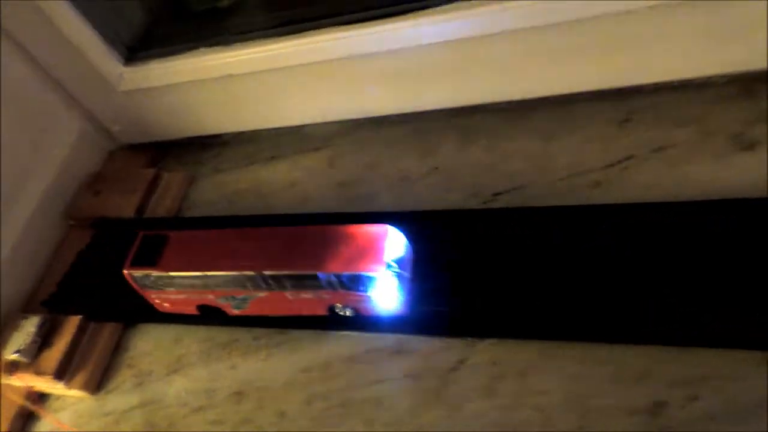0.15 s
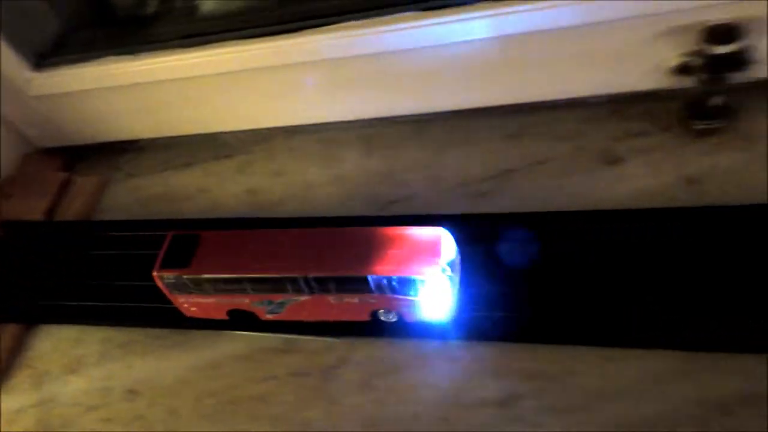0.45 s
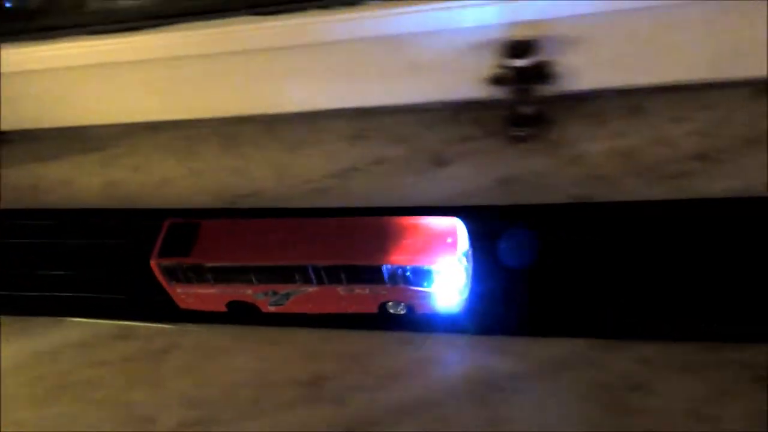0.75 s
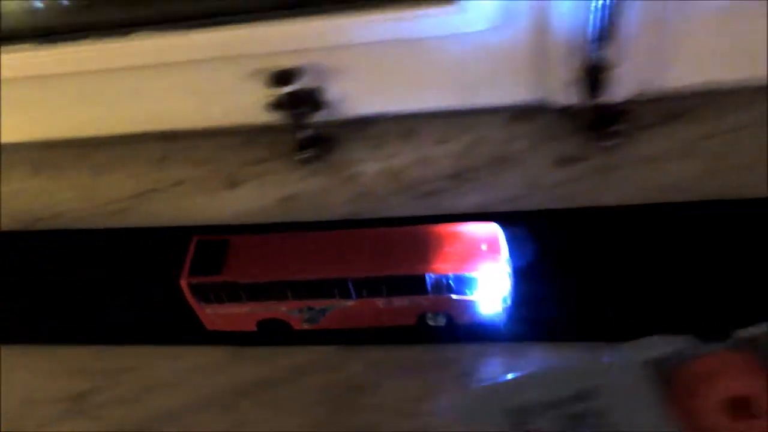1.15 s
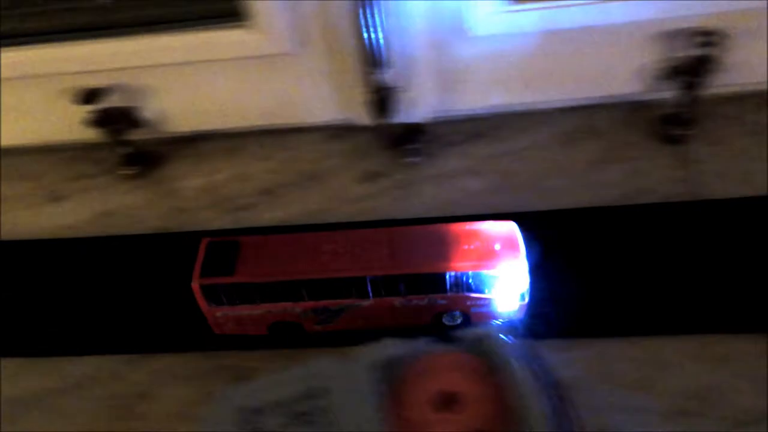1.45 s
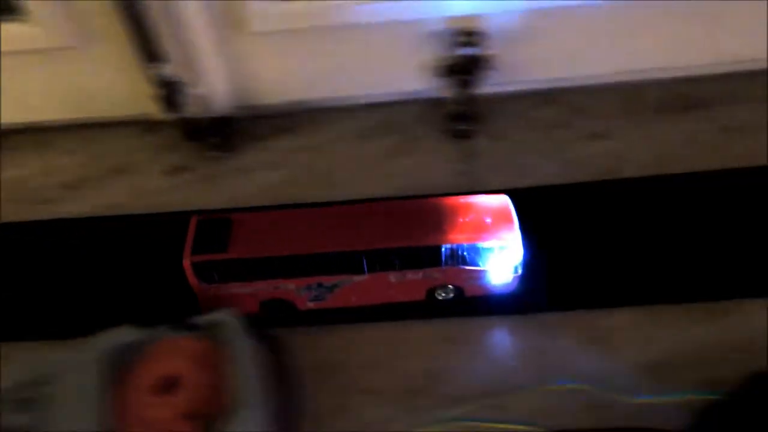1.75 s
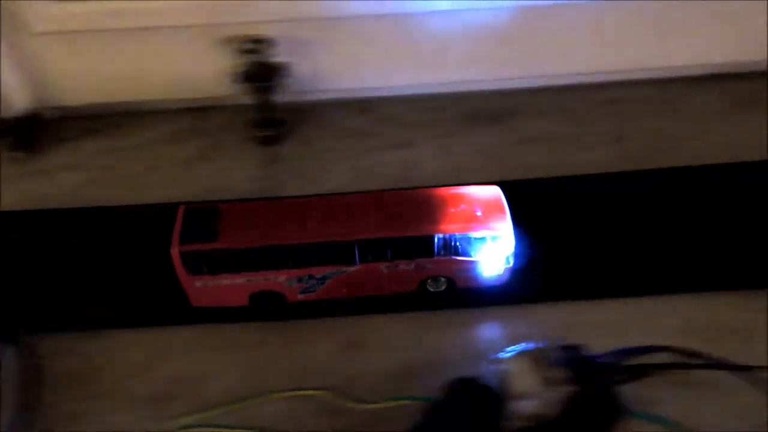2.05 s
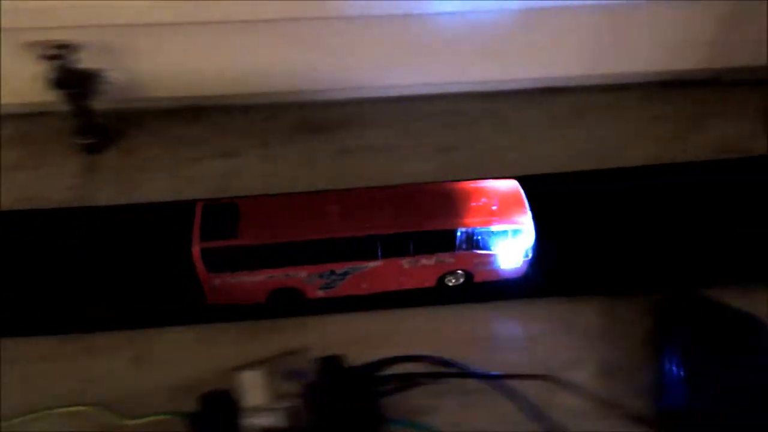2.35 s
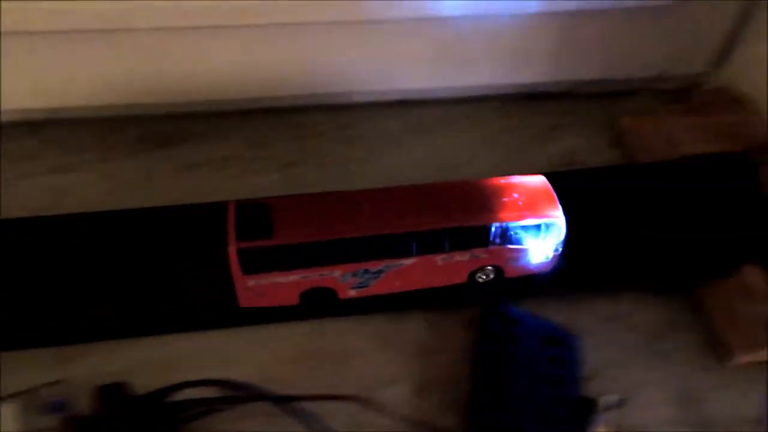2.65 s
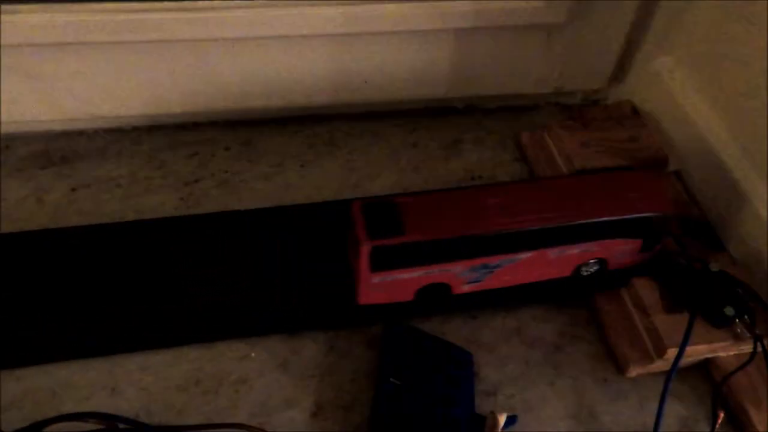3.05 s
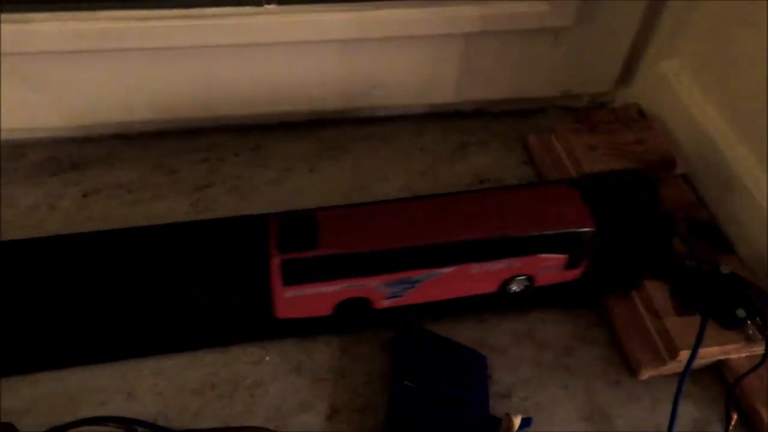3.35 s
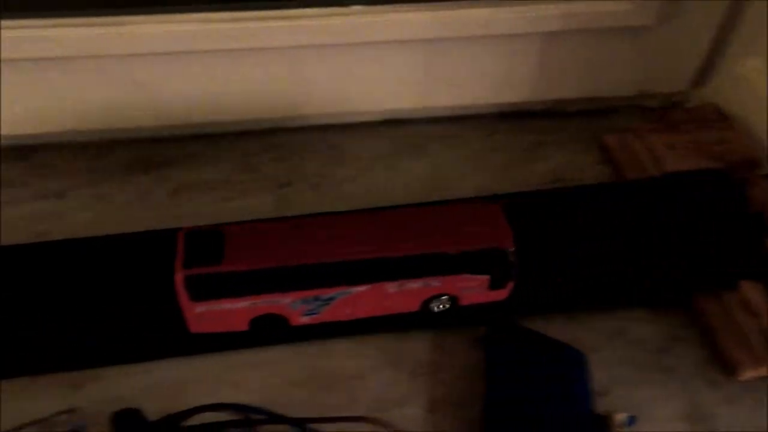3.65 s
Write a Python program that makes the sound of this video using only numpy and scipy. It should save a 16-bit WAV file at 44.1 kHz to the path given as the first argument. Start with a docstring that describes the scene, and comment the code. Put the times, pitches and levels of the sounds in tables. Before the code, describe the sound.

Close up in a quiet room, a toy bus's wheels grind and gears hiss while track joints knock and rattle irregularly; a hard plastic snap at the end, a short lull, then the whir resumes.

```python
"""A small electric toy bus gathers speed along a hollow plastic track on a floor indoors.
Wheels grind as noise roughened by impacts, gears hiss, loose parts ring, and the track hums in drifting modes.
Joints knock the body with short noise-driven rings, cracks and rattles; the rumble swells mid-track.
The bus snaps against the end stop in sharp bursts of noise, the grind dips, and it sets off back.
Faint coloured noise fills the room, and the walls echo the knocks."""
import sys
import numpy as np
from scipy import signal
from scipy.fft import rfft, irfft
from scipy.io import wavfile
from scipy.ndimage import uniform_filter1d

SR = 44100
rng = np.random.default_rng(int(sys.argv[2]) if len(sys.argv) > 2 else 0)


def digitize_waveform(pressure):
    """Quantize a signal to 16-bit integers and store it at the path in sys.argv[1].

    Rows of a 2-D input are taken as channels; values are limited to [-1, 1].
    """
    field = np.atleast_2d(pressure).T
    bounded = np.clip(field, -1, 1)
    quanta = np.round(bounded * 32767).astype(np.int16)
    wavfile.write(sys.argv[1], SR, quanta)


N = 167139

# resonances of the toy's body (f/Hz, width/Hz, level/dB)
BODY = [(1310, 530, 1.5), (1770, 150, 1.5), (2227, 93, 8.5), (2735, 254, 3.5), (3227, 256, 4.5),
        (4710, 520, -4.5)]


def rolling():
    """The bus on the track: hum and rumble, grinding wheels, hissing gears and a shrill chatter."""
    # loudness of the run (t/s, grind level/dB, gear level/dB, shrill chatter level/dB)
    run = [(0, -39, -40, -51), (.28, -38, -38, -45), (.42, -31, -35, -48), (.56, -31.5, -32.5, -38),
           (.93, -30.5, -31.5, -40), (1.26, -26.5, -30, -41), (1.66, -29, -31.5, -42),
           (1.96, -27, -32.5, -37.5), (2.29, -29.5, -30, -35), (2.56, -28.5, -31, -35),
           (2.8, -30, -30, -37), (3.14, -32, -33.5, -37), (3.25, -34, -40, -43), (3.33, -46.5, -41, -45),
           (3.41, -37.5, -36, -46), (3.52, -34.5, -31.5, -50), (3.65, -33, -30.5, -41),
           (3.79, -32, -29, -33)]
    # drift of the stereo image (t/s, left over right/dB)
    left_over_right = [(0, 1.3), (1.2, 0.5), (3.79, -0.5)]
    grind_db, gear_db, chatter_db = curves(run)
    shake_db = 0.7 * walk(24.91)  # flutter shared by wheels and gears
    track = track_hum() + track_rumble()
    grind = level(wheel_grind(shake_db)) * undb(grind_db)
    gears = level(gear_hiss(shake_db)) * undb(gear_db)
    chatter = shrill_chatter() * undb(chatter_db)
    mid, side = track + grind + gears + chatter
    pan_db, = curves(left_over_right)
    return stereo(mid, side) * undb(np.array([pan_db, -pan_db]) / 2)


def wheel_grind(shake_db):
    """Wheels rub grittily on plastic while loose parts tick in the body's resonances."""
    # spectrum of the rubbing (f/Hz, level/dB)
    rub_tone = [(300, -20.5), (750, -4), (1300, 1.5), (2250, 1.5), (3450, -3), (3800, -3), (6000, -3.5),
                (8000, -3), (9000, -3.5), (14000, -20)]
    ticks_db, cluster_db = -10, 1.8  # ticks against the rubbing; how far they bunch in time
    rub = level(colour(grit(shake_db + 0.5 * walk(60)), rub_tone))
    tick_level_db = ticks_db + shake_db + cluster_db * walk(39.97)
    body_ticks = ticks(BODY, 250)  # taps per second in each mode
    return rub + undb(tick_level_db) * body_ticks


def gear_hiss(shake_db):
    """Meshing gears as gritty noise in the high treble, sharing the wheels' flutter."""
    # spectrum of the hiss (f/Hz, level/dB)
    hiss_tone = [(8500, -21), (10500, -3), (12000, 4.5), (12800, 1), (13400, 3), (14200, -2)]
    return colour(grit(0.8 * shake_db + 0.86 * walk(90)), hiss_tone)


def shrill_chatter():
    """Small hard parts tapped so densely that their high resonances merge into a fluttering band."""
    # resonances of the small parts (f/Hz, width/Hz, level/dB)
    small_parts = [(7150, 730, 0.5), (9940, 420, 2), (12640, 340, 5.5)]
    return ticks(small_parts, 1200) * undb(2.0 * walk(29.96))


def track_hum():
    """Three modes of the hollow track, whose pitch and strength change along its length."""
    # hum along the run (t/s, low f/Hz, low level/dB, middle level/dB, upper f/Hz, upper level/dB)
    track_modes = [(.18, 700, -61, -52, 980, -49.5), (.4, 700, -49.5, -38.5, 972, -40.5),
                   (.72, 680, -45, -44, 997, -39.5), (1.0, 665, -46, -51.5, 997, -50),
                   (1.3, 647.5, -45, -37, 990, -45), (1.6, 639.7, -48.5, -44.5, 1000, -40),
                   (1.95, 630, -38.5, -39, 1015, -40), (2.17, 635, -42.5, -47, 1040, -37.5),
                   (2.5, 654.2, -51.5, -41.5, 1070, -50), (3.17, 676, -52.5, -52.5, 1075, -41.5),
                   (3.28, 660, -60, -58, 1075, -54.5), (3.45, 640, -52, -53, 1083, -45.5),
                   (3.79, 635, -51, -42, 1070, -40.5)]
    low_hz, low_db, middle_db, upper_hz, upper_db = curves(track_modes)
    low = hum(low_hz, 65, low_db)
    middle = hum(840, 48, middle_db)
    upper = hum(upper_hz, 70, upper_db)
    return low + middle + upper


def hum(hz, width_hz, db):
    """A noisy resonance: slow noise turns around a drifting centre while its level wavers."""
    drift, waver_db = 0.01, 2.5  # drift as a fraction of the pitch
    slow = signal.lfilter(*signal.butter(2, width_hz / 2, fs=SR), rng.standard_normal((2, 2, N)))
    phase = 2 * np.pi * np.cumsum(hz * (1 + drift * walk(6))) / SR
    tone = slow[0] * np.cos(phase) + slow[1] * np.sin(phase)
    return level(tone) * undb(db + waver_db * walk(16))


def track_rumble():
    """Noise in the track's low resonances, louder over the middle of the track."""
    # low resonances (f/Hz, width/Hz, level/dB)
    low_modes = [(189, 22, 1), (347, 106, -1.5), (570, 33, -0.5)]
    base_db, swell_db, peak_s, span_s = -59, 10.5, 1.77, 0.58
    swell = np.exp(-((np.arange(N) / SR - peak_s) / span_s) ** 2)
    rumble = level(resonate(rng.standard_normal((2, N)), low_modes))
    return rumble * undb(base_db + swell_db * swell)


def grit(flutter_db):
    """Dense tiny impacts of uneven size over smooth rubbing; a pair that flutters together."""
    rate, mean_db, top_db = 600, 3, 10  # impacts per second; their size before and at the cap
    sizes_db = np.minimum(mean_db * rng.exponential(size=N), top_db)
    hits = (rng.random(N) < rate / SR) * undb(sizes_db)
    hit_power = uniform_filter1d(hits ** 2, size=60) * SR / rate / 4
    roughness = np.sqrt(1 + hit_power)
    return rng.standard_normal((2, N)) * roughness * undb(flutter_db)


def ticks(modes, rate):
    """Loose parts chatter: many tiny taps, each ringing one mode briefly."""
    mean_db, top_db = 4, 4.5  # tap size before and at the cap
    out = 0
    for hz, width, db in modes:
        sizes_db = np.minimum(mean_db * rng.exponential(size=N), top_db)
        taps = (rng.random(N) < rate / SR) * undb(sizes_db)
        ring = resonate(taps * rng.standard_normal((2, N)), [(hz, width, db)])
        out = out + resonate(ring, [(hz, 2 * width, 0)])  # second pass rounds the attack
    return level(out)


def knocks():
    """Each joint: a short ring at its own pitch, a bright crack, a rattle through the body."""
    # wheels over joints (t/s, ring level/dB, ring f/Hz, crack over ring/dB, rattle over ring/dB)
    joints = [(0.399, -29, 3770, 9, -12), (0.471, -19.5, 3380, 4, -15), (0.5466, -19, 2230, 4, -19),
              (0.608, -17, 2293, 2, -10), (0.7346, -16.5, 3200, 1, -3), (0.8561, -20, 3070, 2, 0),
              (0.9817, -12, 2340, -2, -3.5), (1.0553, -20.5, 2440, 7, -0.5), (1.102, -14, 2970, -1.5, -7),
              (1.119, -19, 1710, 6, 1.5), (1.2119, -13.5, 3200, -3.5, -2), (1.3231, -17, 3100, -3, -3),
              (1.3592, -18, 2130, 3.5, 1), (1.4286, -19, 1947, 2, -1.5), (1.5377, -14.5, 1578, -1.5, -3.5),
              (1.5877, -22, 2886, 6.5, 2.5), (1.6396, -12.5, 1750, -2.5, -9), (1.734, -17, 2020, 4.5, -1.5),
              (1.7894, -19.5, 2480, -12, -17), (1.8477, -11.5, 2800, -5.5, -10.5),
              (1.955, -18.5, 2010, 2, 0), (2.1082, -19, 2270, -11, -11), (2.1762, -16, 2050, -8, -4.5),
              (2.2807, -18, 2000, 0, -15), (2.397, -14, 3280, 4, -8), (2.5125, -26, 2800, 9, 7),
              (2.5605, -19, 2344, 1, -16), (2.6284, -18.5, 2080, 2.5, -0.5), (2.6729, -19.5, 3260, 7, -2.5),
              (2.7466, -21, 2220, 5.5, 4), (2.8754, -16.5, 2230, -3, -23), (3.0002, -18.5, 2295, -16, -2.5),
              (3.142, -15, 2360, -1.5, -6), (3.1753, -13.5, 2760, -3, -2.5), (3.2945, -25, 2000, -9, -5.5),
              (3.6432, -18, 2720, -4, -5), (3.7705, -22.5, 2270, 2.5, -2.5)]
    ring_t60_s, crack_t60_s, rattle_t60_s = 0.033, 0.017, 0.19  # decay of the driving noise
    rise = rise_curve(0.0017)
    out = np.zeros((2, N))
    for s, db, hz, crack_db, rattle_db in joints:
        noise = rng.standard_normal((3, 2, len(rise))) * rise
        ring = resonate(noise[0] * fade(ring_t60_s), [(hz, 450, 0)])
        crack = resonate(noise[1] * fade(crack_t60_s), [(4370, 5600, 0), (7640, 7700, 0)])
        rattle = resonate(noise[2] * fade(rattle_t60_s), BODY)
        knock = peak(ring) + undb(crack_db) * peak(crack) + undb(rattle_db) * peak(rattle)
        add(out, s, undb(db) * knock)
    return stereo(*out)


def snaps():
    """Hard plastic snaps, most at the end stop: bright noise bursts with a short, weaker tail."""
    # snaps (t/s, level/dB, level of the part under 5 kHz/dB)
    strikes = [(.678, -14, -3), (3.127, -18, 0), (3.181, -17, -5), (3.1905, -16, -10), (3.198, -19, -8),
               (3.2074, -3, -7), (3.2135, -19, -3), (3.218, -21, -1), (3.3523, -16, -25)]
    # spectrum of a snap (f/Hz, level/dB)
    snap_tone = [(470, -54), (800, -9), (3870, -7), (5630, -7.5), (7010, 2), (7910, -2), (13200, -2),
                 (14500, 1)]
    snap_t60_s, tail_db, tail_t60_s = 0.009, -23, 0.06
    decay = fade(snap_t60_s) + undb(tail_db) * fade(tail_t60_s)
    shape = rise_curve(0.002) ** 2 * decay
    noise = stereo(*level(colour(rng.standard_normal((2, N)), snap_tone)))
    low = signal.lfilter(*signal.butter(2, 5000, fs=SR), noise)
    out = np.zeros((2, N))
    for s, db, low_db in strikes:
        i = int(s * SR)
        burst = (noise - (1 - undb(low_db)) * low)[:, i:i + len(shape)]
        add(out, s, undb(db) * shape / shape.max() / 2 * burst)
    return out


def wall_echo(hits):
    """The walls return the knocks as a diffuse tail: convolution with decaying noise."""
    room_t60_s, echo_db = 0.2, -9
    walls = rng.standard_normal((2, int(.3 * SR))) * fade(room_t60_s, length=.3)
    walls = walls / np.sqrt(np.sum(walls[0] ** 2))
    return undb(echo_db) * signal.fftconvolve(hits, walls, axes=1)[:, :N]


def room_tone():
    """The quiet room as steady coloured noise."""
    # spectrum of the room (f/Hz, level/dB)
    quiet_tone = [(20, -2.5), (45, -3), (150, -9), (400, -18.5), (1400, -13), (5700, -49), (12000, -21.5)]
    return stereo(*level(colour(rng.standard_normal((2, N)), quiet_tone))) * undb(-47)


def stereo(mid, side):
    """Left and right from mid and side: alike in the bass, far less alike in the treble."""
    # stereo width (f/Hz, side over mid/dB)
    side_width = [(30, -16), (300, -13), (700, -13), (1400, -6), (3000, -3), (6600, -1), (14000, -2)]
    side = colour(side, side_width)
    return np.array([mid + side, mid - side])


def undb(db):
    """Decibels to an amplitude factor."""
    return 10 ** (np.asarray(db) / 20)


def level(x):
    """Scale to an RMS of 1 over all channels."""
    return x / np.sqrt(np.mean(x ** 2))


def peak(x):
    """Scale to a peak of 1 over all channels."""
    return x / np.abs(x).max()


def curves(table):
    """Columns of a table led by t/s, one value per sample."""
    rows = np.array(table, float).T
    return [np.interp(np.arange(N) / SR, rows[0], column) for column in rows[1:]]


def colour(x, table):
    """Shape the spectrum by (f/Hz, level/dB) points joined on a log frequency axis."""
    hz, db = np.array(table, float).T
    f = np.arange(N // 2 + 1) * SR / N + 1  # +1 keeps the log finite
    gain = undb(np.interp(np.log(f), np.log(hz), db))
    return irfft(rfft(x) * gain, N)


def resonate(x, modes):
    """Sum of resonances (f/Hz, width/Hz, level/dB) with alternate signs."""
    out = 0
    for k, (hz, width, db) in enumerate(modes):
        ring = signal.lfilter(*signal.iirpeak(hz, hz / width, SR), x)
        out = out + (-1) ** k * undb(db) * ring
    return out


def walk(rate):
    """Random levels held 1 / rate s and slewed twice; spread near 1."""
    k = int(SR / rate)
    steps = np.repeat(rng.standard_normal(N // k + 1), k)
    return 1.73 * uniform_filter1d(uniform_filter1d(steps, k), k)[:N]


def fade(t60, length=.2):
    """Exponential decay that falls 60 dB in t60 seconds."""
    return 1000. ** (-np.arange(int(length * SR)) / SR / t60)


def rise_curve(time_constant_s):
    """Exponential approach from 0 to 1."""
    return 1 - fade(time_constant_s * np.log(1000))


def add(out, s, burst):
    """Mix a burst into out from s seconds on."""
    i = int(s * SR)
    out[..., i:i + burst.shape[-1]] += burst[..., :N - i]


def scene():
    """The rolling bus, joint knocks with their echo, snaps and the room."""
    hits = knocks()
    return rolling() + hits + snaps() + wall_echo(hits) + room_tone()


def record(dry):
    """The left channel is a little brighter; a steep low-pass cuts the top of both."""
    left = colour(dry[0], [(4000, 0.026), (9000, 1.5)])  # (f/Hz, level/dB)
    top_cut = signal.ellip(10, .3, 55, 14150, fs=SR, output="sos")
    return signal.sosfilt(top_cut, np.array([left, dry[1]]))


dry = scene()
out = record(dry)
digitize_waveform(out)
```